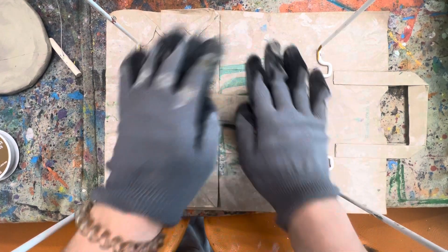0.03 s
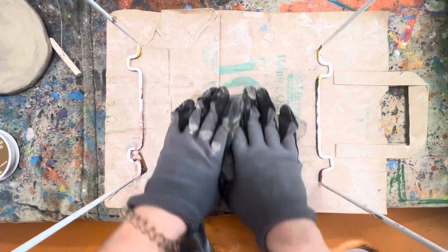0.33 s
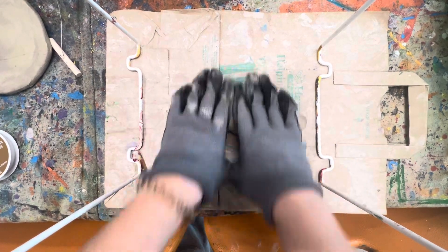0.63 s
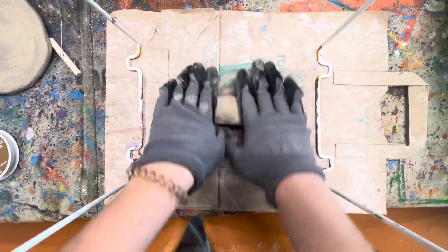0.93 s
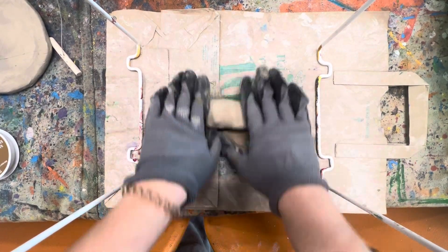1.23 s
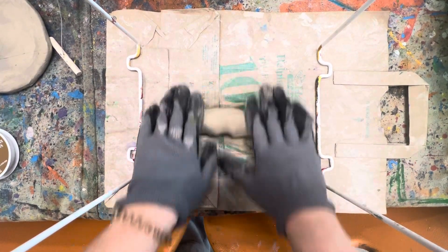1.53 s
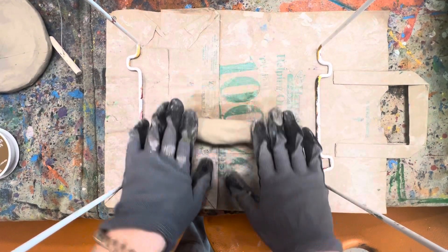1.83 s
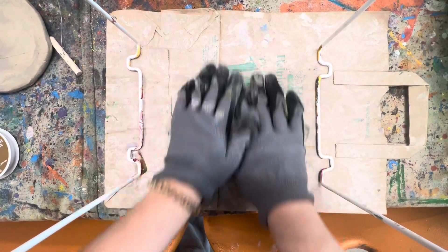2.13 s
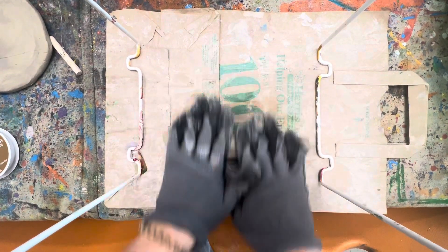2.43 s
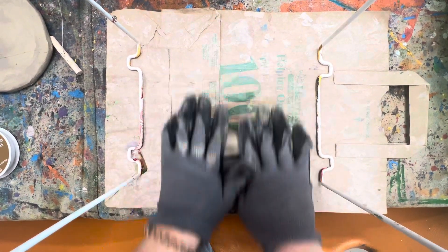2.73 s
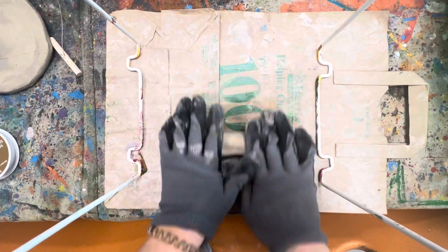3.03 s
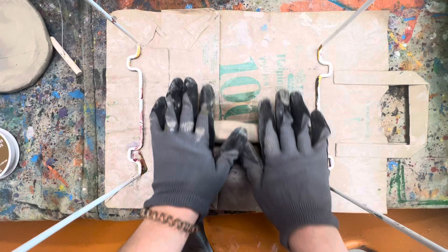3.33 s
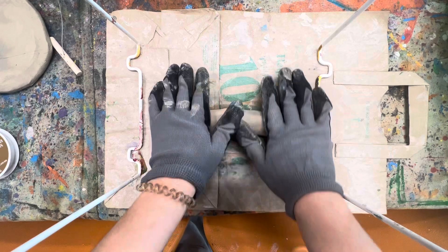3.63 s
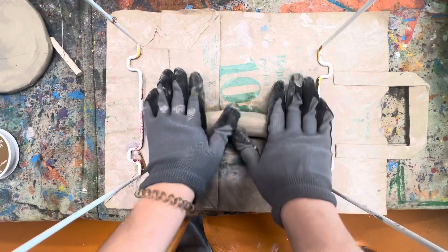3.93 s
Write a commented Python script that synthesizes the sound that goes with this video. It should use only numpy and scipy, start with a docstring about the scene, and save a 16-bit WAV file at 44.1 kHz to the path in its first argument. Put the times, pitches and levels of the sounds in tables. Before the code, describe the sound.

Gloved hands rolling clay back and forth on paper, with soft swishes over a machine hum.

```python
"""Rolling a coil of clay

Gloved hands roll clay to and fro on a paper-covered board. Twice they land with a slap and a
thump of the table. Each push and pull swishes, the paper crackles, and the damp clay lets go
with small sticky pops. Workshop machines hum and rumble throughout."""
import sys
import numpy as np
from scipy import signal
from scipy.fft import rfft, irfft
from scipy.io import wavfile

SR = 44100
rng = np.random.default_rng(int(sys.argv[2]) if len(sys.argv) > 2 else 0)


def store_pcm(level_fs):
    """Save levels as 16-bit WAV."""
    pcm = np.round(np.clip(level_fs, -1, 1) * 32767).astype(np.int16)
    wavfile.write(sys.argv[1], SR, np.atleast_2d(pcm).T)


N = 176400
T = np.arange(N) / SR
HZ = np.fft.rfftfreq(N, 1 / SR)

# Each push or pull: peak_s, rise_s, fall_s, scrape_db, brush_db (base level of hiss and rasp)
HAND_STROKES = [(0.227, 0.081, 0.12, -53, -48.5), (0.363, 0.015, 0.03, -57.5, -48.5),
                (0.524, 0.075, 0.039, -55, -51.5), (.665, 0.052, 0.072, -54, -52),
                (0.851, 0.056, 0.047, -46.5, -40), (1.008, 0.069, 0.072, -50, -48),
                (1.203, .062, .034, -48.5, -45.5), (1.338, 0.044, 0.073, -50.5, -46.5),
                (1.538, 0.051, 0.055, -54.5, -51), (1.691, 0.053, 0.083, -54, -46.5),
                (1.882, 0.039, 0.037, -63, -59), (2.11, 0.068, 0.14, -54.5, -55),
                (2.265, 0.033, 0.047, -49, -49), (2.39, 0.084, 0.063, -57.5, -55.5),
                (2.53, 0.083, 0.06, -51, -59), (2.68, 0.048, 0.089, -51.5, -58.5),
                (2.829, 0.046, 0.029, -48, -46.5), (2.972, 0.071, 0.045, -58.5, -54),
                (3.14, 0.12, 0.082, -57, -60), (3.308, 0.067, 0.04, -55, -57),
                (3.6, 0.068, 0.031, -59.5, -63.5), (3.695, 0.081, 0.1, -59.5, -62.5),
                (3.875, 0.065, 0.081, -58, -66)]
# Tone of clay dragging, glove fabric brushing and paper rasping: frequency_hz, relative_db
SCRAPE_TONE = [(150, -16), (450, -1), (700, -1.5), (880, 0), (1280, -0.5), (1750, -2), (2200, -6),
               (3200, -12), (16000, -25)]
HISS_TONE = [(600, -25), (1750, 3), (2800, -1.5), (4200, -3), (4950, -6.5), (6250, 0.5), (7300, -2),
             (8500, 2), (9700, -2), (11400, -3.5), (16000, -12)]
RASP_TONE = [(1000, -10.5), (1750, 2), (2080, -11), (2850, 2), (3450, -5), (4150, -7), (5000, -18)]
HISS_OFFSET_DB, RASP_OFFSET_DB, ROLLING_FROM_S = -4, -4.5, 2.0


def rubbing():
    """Clay scrapes, gloves hiss and paper rasps, swelling and fading with the speed of the hands."""
    scrape_power, hiss_power, rasp_power = np.zeros((3, N))
    for peak, rise, fall, scrape_db, brush_db in HAND_STROKES:
        swell_db = -12 * (abs(T - peak) / np.where(T < peak, rise, fall)) ** 2.11
        rolling_db = -8 * (peak > ROLLING_FROM_S)  # less rasp once the coil rolls freely
        scrape_power += amp(scrape_db + swell_db) ** 2
        hiss_power += amp(brush_db + HISS_OFFSET_DB + swell_db) ** 2
        rasp_power += amp(brush_db + RASP_OFFSET_DB + rolling_db + swell_db) ** 2
    scrape = np.sqrt(scrape_power) * noise(SCRAPE_TONE, grain=0.56)
    hiss = np.sqrt(hiss_power) * noise(HISS_TONE, grain=0.16)
    rasp = np.sqrt(rasp_power) * noise(RASP_TONE, grain=0.56)
    lumps = amp(2 * wander(hz=28))  # a lumpy coil presses unevenly on the paper
    judder = amp(1.68 * wander(hz=64))
    return (scrape + hiss + rasp * lumps) * judder


# Damp clay letting go: start_s, level_db, pitch_hz, decay_s
CLAY_POPS = [(0.39, -34.5, 1120, 0.00075), (.636, -40, 1380, 0.00098), (2.0574, -39, 1750, 0.00058),
             (2.1297, -38, 980, 0.00088), (2.3423, -40, 1210, 0.00091), (2.5106, -33, 1410, 0.0015),
             (2.5213, -33, 1380, 0.00078), (2.538, -38, 1760, 0.0013), (2.564, -28.5, 1250, 0.001),
             (2.6555, -40, 1190, 0.0011), (2.69, -27.5, 1650, 0.00048), (2.6915, -29, 1360, 0.0021),
             (2.728, -34.5, 1120, 0.00056), (2.791, -30, 1550, 0.00081), (2.819, -33, 1160, 0.0015),
             (2.8274, -31.5, 1220, 0.00075), (3.1163, -32, 1120, 0.00072), (3.2769, -36, 1240, 0.0023),
             (3.5558, -33.5, 1530, 0.00063), (3.7026, -33.5, 1440, 0.0011), (3.8894, -30.5, 1090, 0.00071)]
# Tone of the noise in a pop: frequency_hz, relative_db
POP_TONE = [(550, 9), (880, 24), (1400, -2), (2500, -7), (3300, -14), (9000, -40)]
POP_SAG, POP_SAG_S, POP_MUFFLE_HZ = 0.45, 0.0007, 2650


def pops():
    """A pocket under the clay opens with a tiny ring that starts high and sags to its pitch."""
    ring, burst = np.zeros((2, N))
    for start, db, hz, decay in CLAY_POPS:
        t = np.maximum(T - start, 0)
        attack = 1 - np.exp(-(t / (0.4 * decay)) ** 2)
        loudness = amp(db) * attack * np.exp(-t / decay)
        cycles = hz * (t + POP_SAG * POP_SAG_S * (1 - np.exp(-t / POP_SAG_S)))
        ring += 2 * loudness * np.sin(2 * np.pi * cycles)
        burst += loudness
    scrape = 0.4 * burst * noise(POP_TONE)
    muffle = 1 / np.sqrt(1 + (HZ / POP_MUFFLE_HZ) ** 10)  # soft clay dulls the highs
    return irfft(rfft(ring + scrape) * muffle, N)


# Gloves meeting clay: peak_s, level_db, rise_s, decay_s
GLOVE_SLAPS = [(0.1272, -41.5, 0.00064, 0.0028), (.132, -39, 0.0009, 0.0043),
               (0.1431, -39.5, 0.0009, 0.005), (.184, -34, 0.0028, 0.0036), (.802, -42.5, .001, 0.0067),
               (2.035, -52.5, .0005, 0.036), (2.071, -29.5, 0.0043, 0.0018), (2.076, -23, 0.0006, 0.0037),
               (2.818, -43.5, 0.001, 0.0034)]
# Tone of a slap: frequency_hz, relative_db
SLAP_TONE = [(200, 4.5), (700, -10), (1000, -1.5), (1400, 2.5), (2200, -5), (3000, -10), (3800, -7.5),
             (4900, -19.5), (8000, -16.5), (11000, -23), (16000, -16.5)]


def slaps():
    """Gloves smack the clay: soft bursts of noise that do not ring."""
    loudness = sum(amp(db) * np.exp(-abs(T - peak) / np.where(T < peak, rise, decay))
                   for peak, db, rise, decay in GLOVE_SLAPS)
    return loudness * noise(SLAP_TONE, grain=0.15)


# Weight landing on the table: start_s, level_db
LANDINGS = [(0.1461, -23), (2.0829, -23)]
# The table's own notes: pitch_hz, relative_db, ring_s (time to fade by 60 dB)
TABLE_NOTES = [(48, -3.5, 0.22), (77.6, 6, 0.13), (104.9, 2, 0.28), (167, -16, 0.15)]
THUMP_RISE_S = 0.0051


def thumps():
    """The table's low notes ring under the weight of the hands."""
    out = np.zeros(N)
    for start, db in LANDINGS:
        t = np.maximum(T - start, 0)
        attack = 1 - np.exp(-t / THUMP_RISE_S)
        for hz, note_db, ring_s in TABLE_NOTES:
            out += attack * amp(db + note_db - 60 * t / ring_s) * np.sin(2 * np.pi * hz * t)
    return out


# Snaps of the paper cover: start_s, level_db
PAPER_SNAPS = [(.393, -44), (1.139, -47), (1.495, -43.5), (1.662, -42), (1.8892, -44), (3.434, -50),
               (3.458, -56.5)]
SNAP_DECAY_S = 0.0009


def crackles():
    """The paper snaps faintly as the weight shifts."""
    loudness = sum(amp(db) * (T > start) * np.exp(-abs(T - start) / SNAP_DECAY_S)
                   for start, db in PAPER_SNAPS)
    return loudness * (noise(RASP_TONE) + 0.5 * noise(HISS_TONE))


# One faint squeak: peak_s, half_length_s, pitch_hz, half_width_hz, level_db
GLOVE_SQUEAK = (3.835, .05, 885, 55, -63)


def squeak():
    """Glove rubber slips on clay: a band of noise so narrow that it has a pitch."""
    peak, half_length, hz, half_width, db = GLOVE_SQUEAK
    band = 1 / (1 + ((HZ - hz) / half_width) ** 4)
    slip = unit(irfft(rfft(rng.standard_normal(N)) * band, N))
    return amp(db) * np.exp(-((T - peak) / half_length) ** 4) * slip


ECHO_DB, ECHO_FADE_S = -24.5, 0.14


def room_echo(sound):
    """Reflections from the room add a short, dull tail."""
    tail = (noise(SCRAPE_TONE) * amp(-60 * T / ECHO_FADE_S))[:, :SR // 2]
    tail /= np.linalg.norm(tail[0])
    return amp(ECHO_DB) * signal.fftconvolve(sound, tail, axes=1)[:, :N]


# Humming machines: pitch_hz, level_db
MACHINE_NOTES = [(120, -58.5), (213.8, -61), (240, -36), (262.7, -49), (265.5, -55.5), (295.6, -57.5),
                 (480, -68), (595, -68)]
# Tone of the room's rumble and air: frequency_hz, relative_db
RUMBLE_TONE = [(20, -14), (32, -28), (42, -5), (65, -7), (85, 1), (102, 4), (116, 1), (132, 1), (147, -2.5),
               (170, -9.5), (250, -8), (310, -9.5), (380, -23.5), (550, -25), (900, -38), (2500, -67)]
AIR_TONE = [(100, -7.5), (700, -16), (1400, 0), (3000, -4.5), (5000, -7), (8500, -3.5), (10000, -6.5),
            (16000, -7.5)]
RUMBLE_DB, AIR_DB = -41.5, -68


def workshop():
    """Steady machine notes beat against each other over rumble and faint air noise."""
    hum = np.zeros(N)
    for hz, db in MACHINE_NOTES:
        loudness = np.sqrt(2) * amp(db + 0.3 * wander(hz=5.4))
        phase = 2 * np.pi * (hz * T + rng.random()) + 0.24 * wander(hz=2.1)
        hum += loudness * np.sin(phase)
    return hum + amp(RUMBLE_DB) * noise(RUMBLE_TONE) + amp(AIR_DB) * noise(AIR_TONE)


# How alike the two microphones sound: frequency_hz, likeness (0 unrelated, 1 the same)
STEREO_LIKENESS = [(100, 1), (330, 0.74), (620, 0.096), (1150, 0.76), (1900, 1), (3200, 0.58), (4100, 0.86),
                   (5000, 0.47), (6600, 0.81), (8000, 0.26), (11300, 0.78), (12600, .998)]
CLICKS_PER_S = 1500


def noise(tone, grain=0):
    """Stereo noise of strength 1 with the given tone; grain is the share made of tiny clicks."""
    clicks = unit(rng.standard_normal((2, N)) * (rng.random(N) < CLICKS_PER_S / SR))
    smooth = rng.standard_normal((2, N))
    shared, apart = rfft(np.sqrt(1 - grain) * smooth + np.sqrt(grain) * clicks)
    likeness = curve(STEREO_LIKENESS)
    shared *= np.sqrt(1 + likeness)
    apart *= np.sqrt(1 - likeness)
    left_right = np.array([shared + apart, shared - apart])
    return unit(irfft(left_right * amp(curve(tone)), N))


def wander(hz):
    """A smooth random wobble of strength 1, up to about this rate."""
    return unit(irfft(rfft(rng.standard_normal(N)) / (1 + (HZ / hz) ** 4), N))


def curve(points):
    """Joins a table's points to give a value at every frequency."""
    hz, value = np.transpose(points)
    return np.interp(np.log(HZ + 1), np.log(hz), value)


def amp(db):
    """Turns decibels into a multiplier."""
    return 10 ** (np.asarray(db) / 20)


def unit(x):
    """Scales a signal to an average strength (rms) of 1."""
    return x / np.sqrt(np.mean(x ** 2) + 1e-20)


def scene():
    """Hands and clay in the humming room."""
    hands = rubbing() + pops() + slaps() + crackles() + squeak() + thumps()
    return hands + room_echo(hands) + workshop()


# How far the left microphone's wave trails the right's: frequency_hz, lag_radians
LEFT_LAG = [(640, 2.74), (950, .001), (4200, 0.087), (5000, 2.05), (5700, .05), (7000, 0.6), (8300, 0.95),
            (9600, 1.65), (11300, 1.8), (12300, 3.2), (16000, 3.12)]
TREBLE_LIMIT_HZ = 15800


def record(dry):
    """The two microphones fall out of step above the bass and lose the very highest sounds."""
    above_bass = np.clip((HZ - 400) / 200, 0, 1)
    half_shift = np.exp(0.5j * curve(LEFT_LAG) * above_bass)
    responses = irfft(np.array([1 / half_shift, half_shift]) * (HZ < TREBLE_LIMIT_HZ), N)
    filters = np.roll(responses, 512, axis=1)[:, :1025] * np.kaiser(1025, 9)
    padded = np.pad(dry, ((0, 0), (512, 512)), "reflect", reflect_type="odd")
    balance = amp([[0.2], [-0.2]])  # left is a touch louder
    return signal.oaconvolve(padded, filters, "valid", axes=1) * balance


dry = scene()
out = record(dry)
store_pcm(out)
```